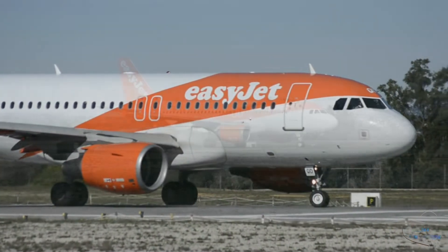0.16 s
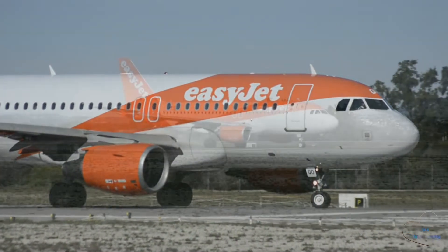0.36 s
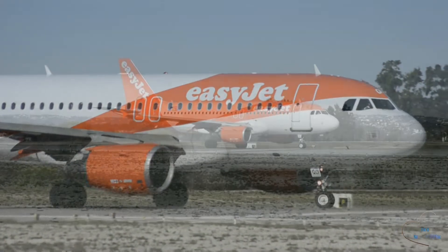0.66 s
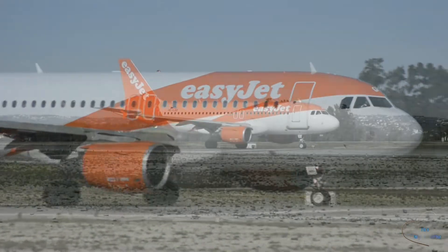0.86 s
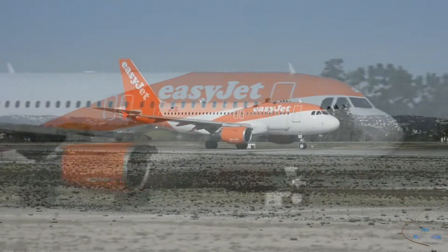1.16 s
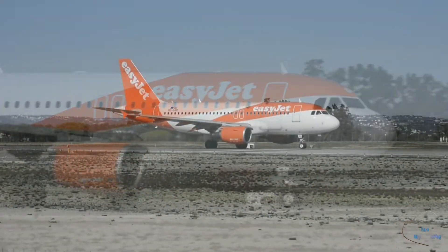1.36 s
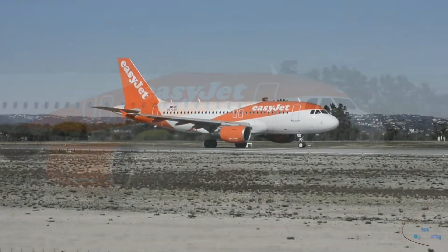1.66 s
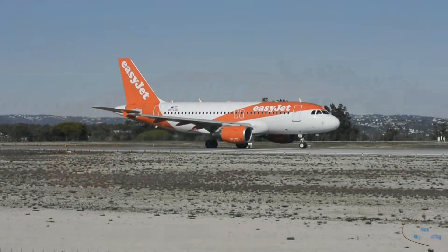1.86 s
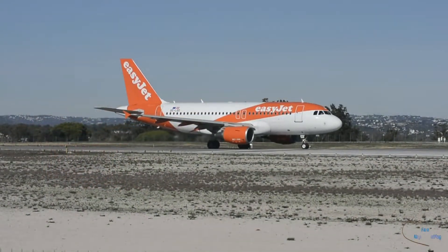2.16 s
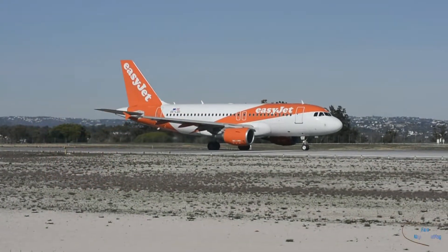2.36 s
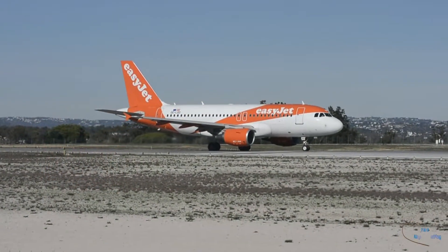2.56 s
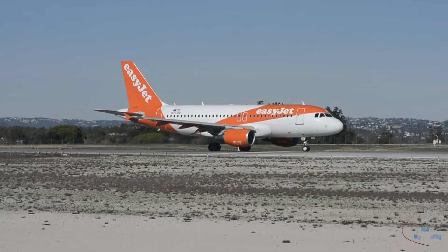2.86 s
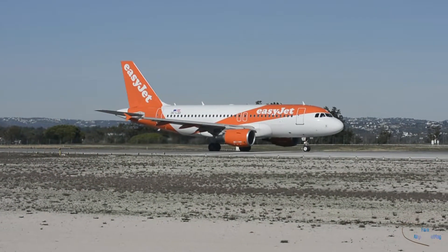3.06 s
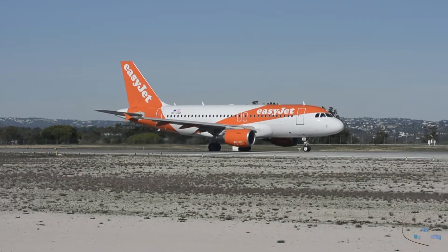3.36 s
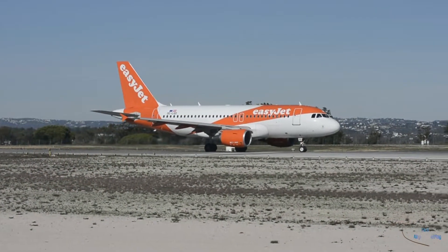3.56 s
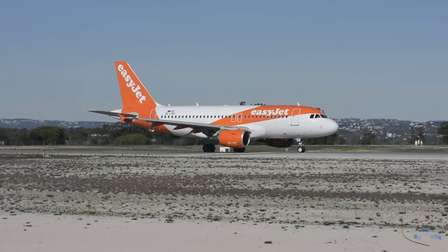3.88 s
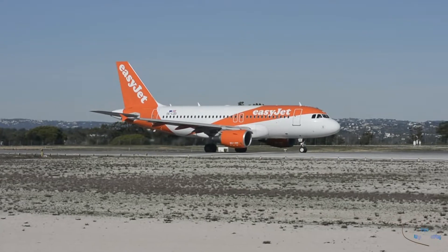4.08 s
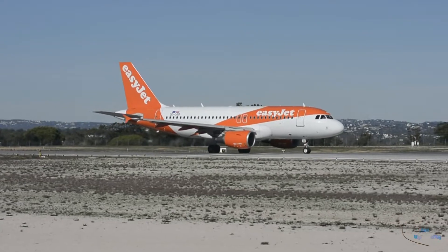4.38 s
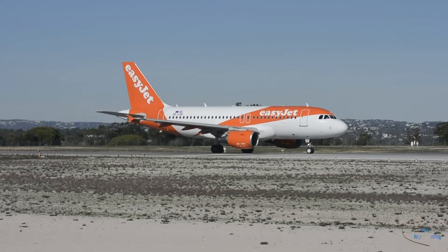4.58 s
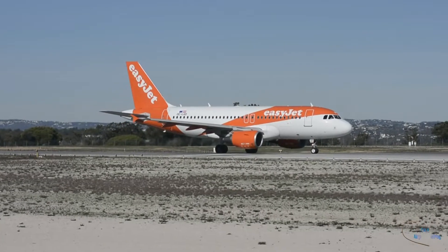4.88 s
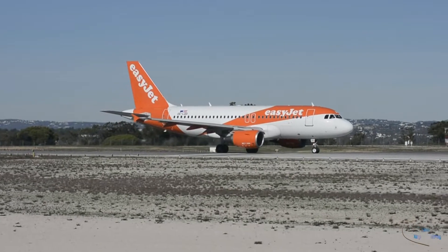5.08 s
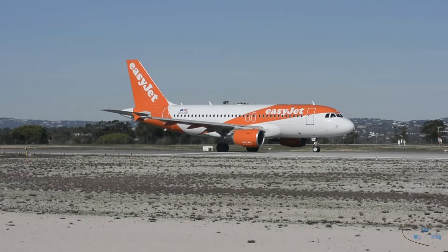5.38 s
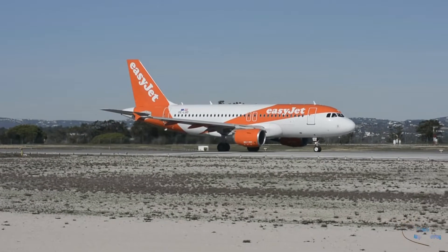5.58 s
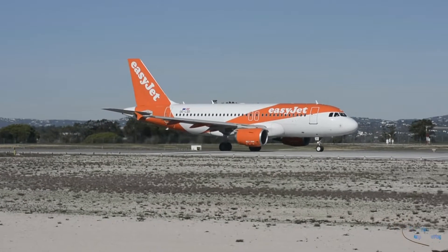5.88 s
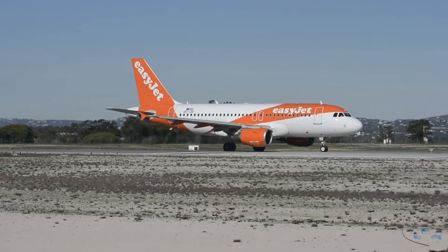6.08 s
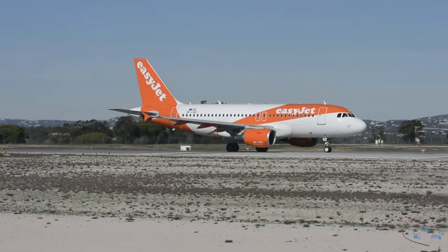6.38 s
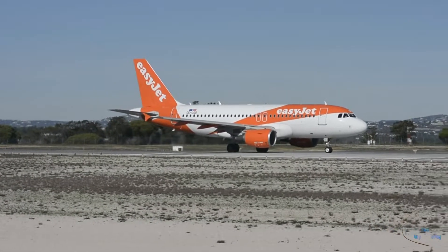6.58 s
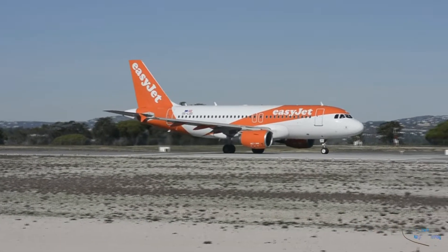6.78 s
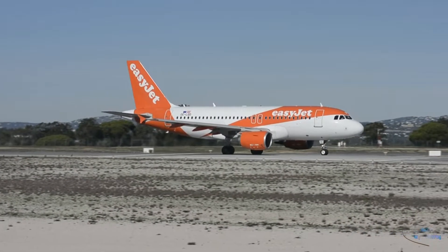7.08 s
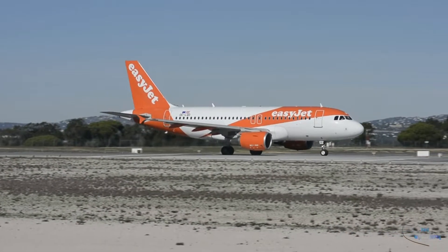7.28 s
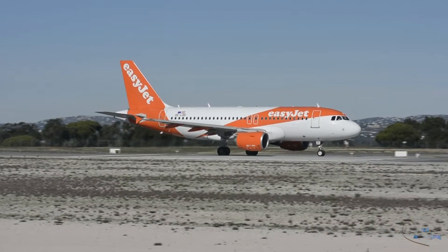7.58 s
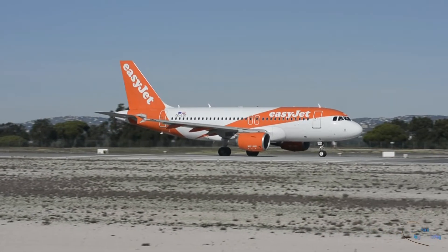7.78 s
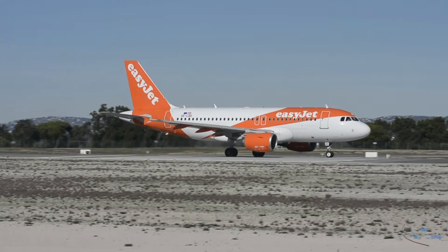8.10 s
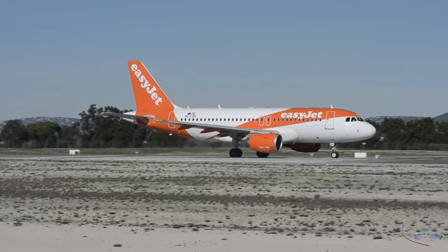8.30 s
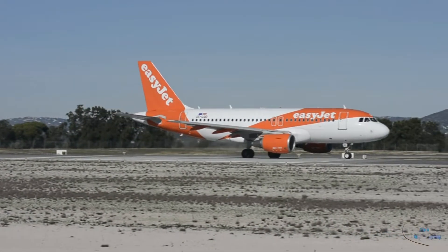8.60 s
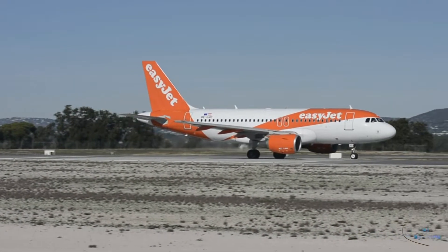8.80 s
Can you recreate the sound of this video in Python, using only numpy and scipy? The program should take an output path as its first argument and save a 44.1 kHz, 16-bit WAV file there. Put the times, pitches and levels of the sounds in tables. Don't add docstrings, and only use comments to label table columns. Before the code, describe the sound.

Open airfield, one exposed distant microphone. Quiet engine idle and breathy hiss come first; then the fan tone rises smoothly, holds with the noise easing, and rises higher to full power. A deep jet roar swells beneath a fluttering, beating whine and gritty buzz-saw edge. Irregular wind rumbles and bumps throughout, over very faint hiss and a thin high whistle.

```python
import sys
import numpy as np
from scipy import signal
from scipy.fft import rfft, irfft, next_fast_len
from scipy.io import wavfile
from scipy.ndimage import uniform_filter1d

SR = 44100
rng = np.random.default_rng(int(sys.argv[2]) if len(sys.argv) > 2 else 0)


def field_ratio(decibels):
    return 10 ** (np.asarray(decibels, dtype=float) / 20)


def store_pcm(level_fs):
    pcm = np.round(np.clip(level_fs, -1, 1) * 32767).astype(np.int16)
    wavfile.write(sys.argv[1], SR, np.atleast_2d(pcm).T)


N = 394254
TIME_S = np.arange(N) / SR
BLADES = 36


def rms_one(x):
    return x / np.sqrt(np.mean(x ** 2) + 1e-20)


def in_time(rows):
    start_s, *columns = np.transpose(rows)
    return [np.interp(TIME_S, start_s, column) for column in columns]


def at_hz(points, hz):
    point_hz, point_db = np.transpose(points)
    return np.interp(np.log(hz), np.log(point_hz), point_db, -70, -70)


def bumps(rows):
    return sum(height * np.exp(-.5 * ((TIME_S - s) / width_s) ** 2) for s, height, width_s in rows)


def resonance(blade_hz, best_hz, range_hz):
    return np.exp(-.5 * ((blade_hz - best_hz) / range_hz) ** 2)


def drift(rate):
    pole = np.exp(-80 * np.pi * rate / SR)
    noise = rng.standard_normal(N // 40 + 2002)
    slow = signal.lfilter([1], [1, -2 * pole, pole * pole], noise)[2000:]
    return np.interp(np.arange(N) / 40, np.arange(len(slow)), rms_one(slow))


def band(low_hz, high_hz):
    sos = signal.butter(2, [low_hz, high_hz], "band", fs=SR, output="sos")
    return signal.sosfilt(sos, rng.standard_normal(N + 9000))[9000:]


def bands(low_hz, count):
    edges = low_hz * 2 ** (np.arange(count + 1) / 3)
    return zip(edges, edges[1:], np.sqrt(edges[1:] * edges[:-1]))


def coloured(spectrum, patchy_db, rate):
    low_hz, high_hz = spectrum[0][0], spectrum[-1][0]
    out = 0
    for low, high, hz in bands(low_hz, count=int(3 * np.log2(high_hz / low_hz))):
        out = out + field_ratio(at_hz(spectrum, hz) + patchy_db * drift(rate)) * band(low, high)
    return rms_one(out)


def scattered(turns, scatter, rate):
    share = np.clip(scatter, 0, 1)
    field = np.sqrt(1 - share) + np.sqrt(share / 2) * (drift(rate) + 1j * drift(rate))
    return np.sqrt(2) * np.real(field * np.exp(2j * np.pi * (turns + rng.random())))


# pitch_hz, level_db
AIR = [(700, -8), (1000, -11), (1500, -1), (2200, -0.5), (3000, -0.5), (3600, -2), (4200, -8.5),
       (5200, -10.5), (6000, -17.5), (6600, -27.5), (8000, -37), (9500, -47.5), (12000, -65.5)]


def air_db(hz):
    return at_hz(AIR, hz)


# start_s, treble gain at 6 kHz level_db
CLEAR = [(0, -7.5), (1.5, -4.5), (2.0, -2), (2.35, 2.5), (4.0, 0.5), (4.4, -3.5), (5.3, 0.5), (6.2, 0.5),
         (8.94, 2)]


def clearing(hz, limit=1.2):
    return in_time(CLEAR)[0] * np.minimum(hz / 6000, limit) ** 2


# start_s, blade_rate_hz
SPEED = [(0, 792), (.75, 786), (1.8, 911), (2.1, 941), (2.4, 1001), (2.7, 1090), (3.0, 1206), (3.6, 1473),
         (3.9, 1519), (4.2, 1538), (4.65, 1511), (5.4, 1512), (5.85, 1670), (6.6, 2100), (6.9, 2251),
         (7.2, 2294), (7.7, 2301), (8.94, 2329)]


def fan_speed():
    return uniform_filter1d(in_time(SPEED)[0], size=SR // 3, mode="nearest")


# start_s, level_db
EFFORT = [(0, -64), (.5, -66), (1.4, -64.5), (1.8, -59.5), (2.3, -60), (2.76, -58.5), (3.19, -55),
          (3.8, -52.5), (4.16, -54.5), (4.73, -60), (5.13, -61), (5.5, -59.5), (5.9, -58.5), (6.6, -53.5),
          (7.1, -49), (7.9, -47), (8.35, -49.5), (8.94, -48)]
# centre_s, gain_db, half_width_s
SWELLS = [
    (1.92, 1.5, 0.038),
    (3.33, 0, 0.022),
    (3.85, -0.5, 0.02),
    (7.0, 0, 0.014),
    (7.55, 2, 0.026),
    (7.68, 0.5, .04),
    (7.8, 0, 0.06),
    (7.95, 1.5, .05),
    (8.3, 0.5, 0.084),
    (8.58, 0, .05),
]


def received_effort():
    return in_time(EFFORT)[0], bumps(SWELLS)


LAW_SPEEDS = [790, 865, 935, 1050, 1250, 1450, 1540, 1750, 2050, 2260, 2300, 2330]


def at_speed(rows, blade_hz):
    return [np.interp(blade_hz, LAW_SPEEDS, column) for column in np.transpose(rows)]


# tone_db, second_db, third_db, fourth_db
INLET = [(-18, -26, -22, -23), (-11, -17, -29, -17), (-4, -6, -10, -9), (1, -12, -19, -18),
         (1, -7, -8, -21), (-5, -5.5, -15, -16), (-5, -5, -15.5, -24), (-1.5, -2.5, -14, -26),
         (7.5, -7, -24, -45), (6.5, -16, -34, -51), (5, -11, -32, -48.5), (2, -13.5, -28, -49.5)]
# centre_s, gain_db, half_width_s
BEATS = [(2.9, -5, 0.035), (4.2, -7, 0.083), (4.55, 6.5, 0.03), (5.3, -4, 0.056), (6.05, 6, 0.03),
         (6.25, -8, 0.053), (6.6, 2.5, 0.052), (6.76, -5, 0.12), (7.02, 1.5, 0.051), (7.35, -3.5, 0.018),
         (7.44, 0.5, 0.017), (7.8, -11, 0.048), (7.95, 1.5, 0.032), (8.08, 7.5, 0.032), (8.29, -8.5, 0.052),
         (8.6, 7, 0.042), (8.72, -3, 0.072), (8.88, 3, 0.027)]
# centre_s, gain_db, half_width_s
SECOND_BEATS = [(2.7, -14, 0.071), (3.34, 9, 0.047), (3.89, 4, 0.054), (4.88, 7, 0.026), (5.0, -4, 0.017),
                (6.63, -3, 0.056), (7.27, 0.5, .06), (7.6, -7, 0.034), (7.75, -10.5, 0.025),
                (8.06, 7, 0.029), (8.33, 5, .03), (8.65, 7.5, 0.043), (8.8, 9, 0.033), (8.89, -7, .03)]


def blade_whine(blade_hz, effort_db, swell_db):
    tone_focus = 1.2
    levels_db = [effort_db + tone_focus * swell_db + db for db in at_speed(INLET, blade_hz)]
    levels_db[0] += bumps(BEATS)
    levels_db[1] += bumps(SECOND_BEATS)
    blade_turns, out = np.cumsum(blade_hz) / SR, 0
    for k, level_db in enumerate(levels_db):
        whine = scattered((k + 1) * blade_turns, scatter=.45 + .2 * k, rate=24 + 20 * k)
        out = out + field_ratio(level_db + clearing((k + 1) * blade_hz)) * whine
    return out


# multiple of the blade rate, density level_db per Hz
WAKES = [(.3, 7), (.6, -1), (.9, 0.5), (1.2, -2), (1.6, -1.5), (2.2, -0.5), (3.5, 3), (6.0, 4.5)]


def fan_wakes(blade_hz, level_db):
    out, power, swirl = 0, 0, drift(5.2)
    multiples, wake_db = np.transpose(WAKES)
    for low, high, hz in bands(751, count=12):
        gain = field_ratio(np.interp(hz / blade_hz, multiples, wake_db) + clearing(hz, limit=np.inf))
        out = out + gain * field_ratio(.4 * swirl + .7 * drift(9)) * band(low, high)
        power = power + (gain * field_ratio(air_db(hz))) ** 2 * (high - low) * (2500 < hz < 6500)
    size = next_fast_len(N)
    air = field_ratio(air_db(np.arange(size // 2 + 1) * SR / size + 1))
    source = field_ratio(level_db - 1.78) * out / np.sqrt(power * 2 / SR)
    return irfft(rfft(source, size) * air, size)[:N]


# core_db against effort, exhaust_db
JETS = [(4.5, -58), (9, -52), (7.5, -52.5), (10, -45.5), (9.5, -48.5), (6, -49.5), (3, -51), (1.5, -44.5),
        (3.5, -40.5), (-0.5, -39.5), (2, -37), (4.5, -36)]
# centre_s, gain_db, half_width_s
FLARES = [
    (3.3, 1.5, 0.35),
    (5.55, 4.5, 0.16),
    (7.25, 0.5, .1),
]


def jet_levels(blade_hz, fan_db):
    core_db, exhaust_db = at_speed(JETS, blade_hz)
    return core_db + fan_db + bumps(FLARES), exhaust_db


# pitch_hz, density level_db per Hz
EXHAUST = [(24, -36.5), (40, -11), (70, 2.5), (135, 1.5), (177, -4.5), (250, -7.5), (346, -14),
           (450, -13.5), (580, -36.5), (990, -120)]


def exhaust_roar(exhaust_db):
    return field_ratio(exhaust_db) * coloured(EXHAUST, patchy_db=1.5, rate=3)


# pitch_hz, density level_db per Hz
CORE = [(150, -19), (250, -4.5), (285, -14.5), (457, -0.5), (720, -1.5), (788, 1.5), (1070, -5),
        (1460, -13.5), (1800, -20.5), (2340, -49), (3960, -120)]


def core_roar(core_db):
    return field_ratio(core_db - 1.5) * coloured(CORE, patchy_db=1.5, rate=4.8)


# pitch_hz, smear_hz, wavering share 0-1
HUM_MODES = [(144, 3.0, .15), (180, 9.0, .7), (255, 25.0, 1), (830, 40.0, 1)]
# level_db, best blade_rate_hz, range_hz, lasting rest_db against
HUM_SPEEDS = [
    (-53, 784, 26, -12),
    (-49, 1044, 136, -16.5),
    (-48, 2330, 35, -29),
]


def combustor(blade_hz, exhaust_db, core_db):
    gains = []
    for db, best_hz, range_hz, rest_db in HUM_SPEEDS:
        gains.append(field_ratio(db) * resonance(blade_hz, best_hz, range_hz) + field_ratio(exhaust_db + rest_db))
    gains.append(field_ratio(core_db - 11))
    return sum(gain * scattered(hz * TIME_S, share, smear_hz)
               for gain, (hz, smear_hz, share) in zip(gains, HUM_MODES))


# pitch_hz, density level_db per Hz
GUST = [(8.8, -41), (15, 1), (59, 0), (80, 2), (165, -10), (221, -18), (311, -30), (350, -19), (460, -63.5),
        (770, -120)]
# centre_s, level_db, half_width_s
GUSTS = [(.1, -53, 0.16), (.82, -47.5, 0.18), (1.09, -66, 0.022), (1.33, -43, 0.17), (2.12, -42.5, 0.25),
         (2.398, -36, 0.035), (2.52, -31.5, 0.026), (2.66, -34.5, 0.017), (3.1, -46, 0.6),
         (4.0, -53, 0.092), (4.26, -39.5, 0.1), (4.49, -44.5, 0.058), (4.67, -45, 0.038),
         (4.88, -46.5, 0.1), (5.04, -57, 0.021), (5.15, -48, 0.019), (5.44, -41, 0.15),
         (5.74, -42.5, 0.085), (5.9, -41, 0.02), (6.08, -43.5, 0.043), (6.19, -41, 0.027),
         (6.31, -36, 0.017), (6.49, -38, 0.037), (7.28, -46.5, 0.13), (7.42, -45, 0.017),
         (7.85, -43.5, 0.077), (8.1, -50, .1), (8.62, -38, 0.073), (8.82, -37, 0.11)]


def wind():
    breeze = field_ratio(-55 + 1 * TIME_S)
    gusts = bumps([(s, field_ratio(db), width_s) for s, db, width_s in GUSTS])
    return (breeze * .5 + gusts) * coloured(GUST, patchy_db=1.0, rate=10)


def electronics():
    hiss_db, whistle_db, whistle_hz = -87, -88, 15682.3
    hiss = field_ratio(hiss_db + 4.5) * rng.standard_normal(N)
    return hiss + field_ratio(whistle_db) * np.sin(2 * np.pi * whistle_hz * TIME_S)


# start_s, pitch_hz
CORE_WHINE = [(.7, 5080), (1.1, 5240), (1.5, 5470), (2.0, 5920), (2.3, 6250), (2.6, 6650), (2.9, 7150),
              (3.1, 7500)]


def core_whine():
    hz = in_time(CORE_WHINE)[0]
    fade = np.clip(np.minimum(TIME_S - .6, 3.2 - TIME_S) / .9, 0, 1)
    return field_ratio(-68.5 + air_db(hz)) * fade * scattered(np.cumsum(hz) / SR, scatter=.95, rate=15)


# shaft_order, smear_hz
STAGE_ORDERS = [(92, 14), (128, 14), (164, 16), (176, 16), (100, 16), (136, 16), (137, 50), (140, 50),
                (104, 50), (150, 60), (72, 60), (108, 80), (140, 200), (53, 130), (32, 130)]
# level_db against effort, best blade_rate_hz, range_hz
STAGES = [(-9, 1510, 55), (-6, 1490, 60), (-1, 1490, 35), (-6, 1440, 30), (-10, 2150, 300),
          (-17, 2200, 200), (0, 925, 35), (-1, 872, 28), (-7, 1200, 90), (-2, 1200, 80), (-9, 1100, 140),
          (-7, 960, 100), (4, 1290, 70), (-9.5, 2310, 60), (-7.5, 2300, 40)]


def stage_tones(blade_hz, fan_db):
    out, shaft = 0, np.cumsum(blade_hz) / BLADES / SR
    for (order, smear_hz), (db, best_hz, range_hz) in zip(STAGE_ORDERS, STAGES):
        hz = order * blade_hz / BLADES
        cut_on = resonance(blade_hz, best_hz, range_hz)
        level_db = fan_db + db + air_db(hz) + clearing(hz) + 2.5 * drift(3)
        out = out + field_ratio(level_db) * cut_on * scattered(order * shaft, scatter=.99, rate=smear_hz)
    return out


# centre_s, peak level_db, pitch_hz
THUMPS = [(2.393, -19, 75.4), (2.42, -19.5, 53.8), (2.463, -21.5, 96.5), (2.5, -40, 51.1), (2.52, -21, 119),
          (2.535, -23, 65), (2.603, -24, 142), (2.646, -17, 51.1), (2.7, -26, 53.8), (8.704, -18, 51.1),
          (8.731, -36, 101)]


def port_eddies():
    out = np.zeros(N)
    for s, db, hz in THUMPS:
        t = TIME_S - s - .001
        out += field_ratio(db - 6) * np.exp(-(2.6 * hz * t) ** 2) * np.cos(2 * np.pi * hz * t)
    return out


SAW_ORDERS = [4, 11, 13, 14, 16, 17, 18, 19, 20, 21, 23, 25, 29, 30, 38, 45, 47, 52, 53, 56, 64]
SAW = [-57, -62, -59, -60, -62, -60, -63, -60, -59, -62, -62, -65, -64, -66, -65, -69, -70, -71, -70, -71,
       -76]


def shock_saw(blade_hz):
    sonic_hz, sonic_range_hz = 2240, 25
    sonic = 1 / (1 + np.exp((sonic_hz - blade_hz) / sonic_range_hz))
    out, shaft = 0, np.cumsum(blade_hz) / BLADES / SR
    for order, db in zip(SAW_ORDERS, SAW):
        out = out + field_ratio(db + 1.5) * sonic * scattered(order * shaft, scatter=.4, rate=7)
    return out


def scene():
    blade_hz = fan_speed()
    effort_db, swell_db = received_effort()
    fan_db = effort_db + swell_db
    core_db, exhaust_db = jet_levels(blade_hz, fan_db)
    fans = blade_whine(blade_hz, effort_db, swell_db) + fan_wakes(blade_hz, fan_db)
    jets = exhaust_roar(exhaust_db) + core_roar(core_db) + combustor(blade_hz, exhaust_db, core_db)
    rotors = core_whine() + stage_tones(blade_hz, fan_db) + shock_saw(blade_hz)
    return (fans + jets + rotors + wind() + port_eddies())[None]


def top_cut(x):
    return signal.sosfilt(signal.butter(12, 15710, fs=SR, output="sos"), x)


def record(dry):
    ending = np.clip((N - np.arange(N)) / 150, 0, 1)
    return top_cut((dry + electronics()) * ending)


dry = scene()
out = record(dry)
store_pcm(out)
```